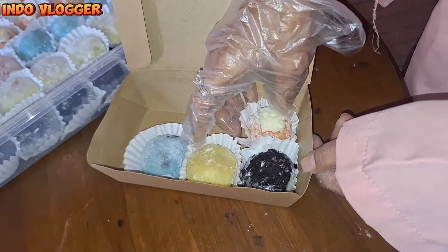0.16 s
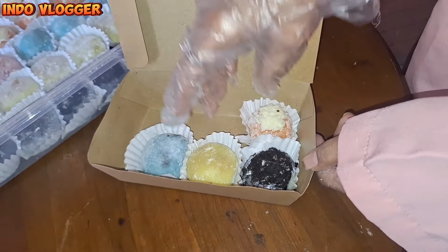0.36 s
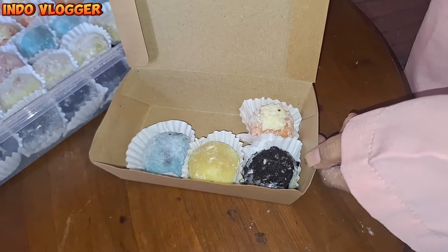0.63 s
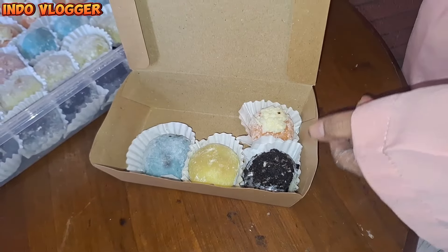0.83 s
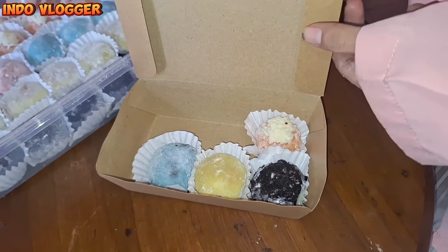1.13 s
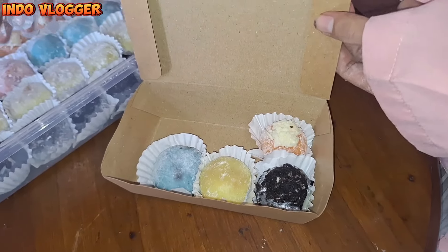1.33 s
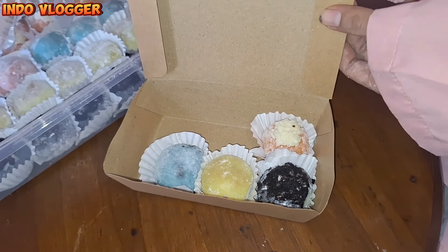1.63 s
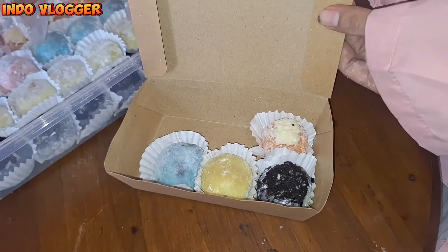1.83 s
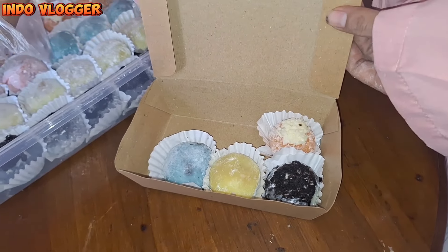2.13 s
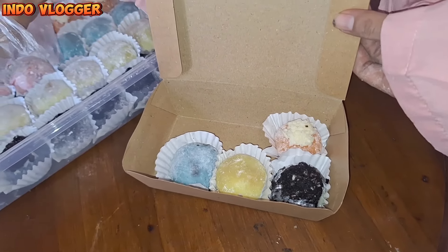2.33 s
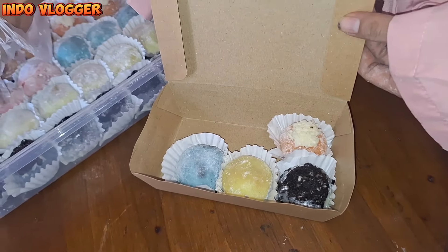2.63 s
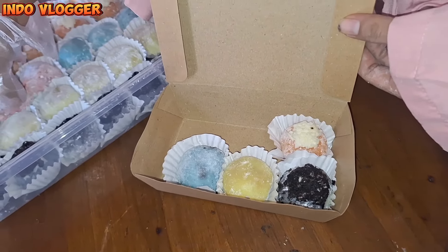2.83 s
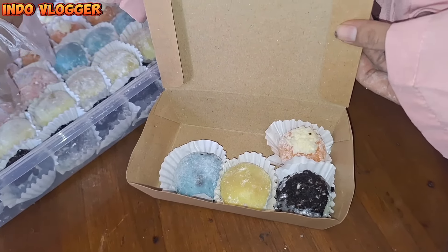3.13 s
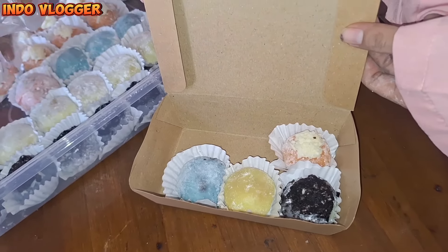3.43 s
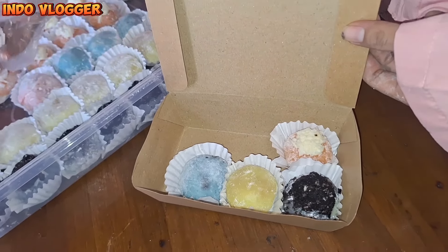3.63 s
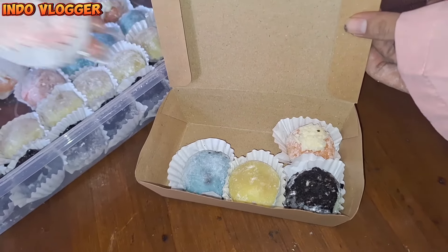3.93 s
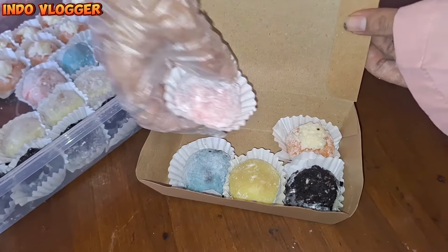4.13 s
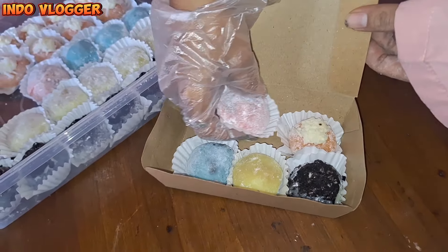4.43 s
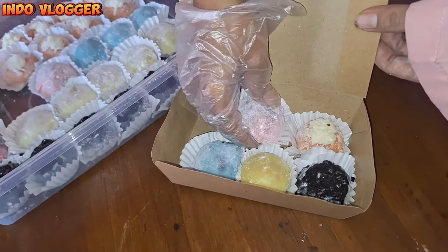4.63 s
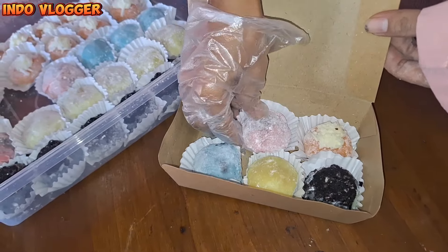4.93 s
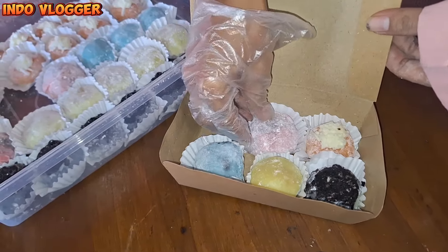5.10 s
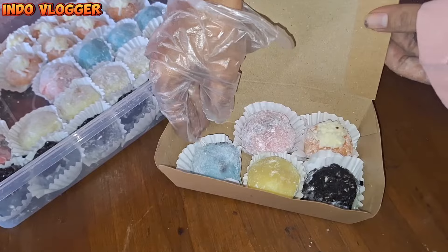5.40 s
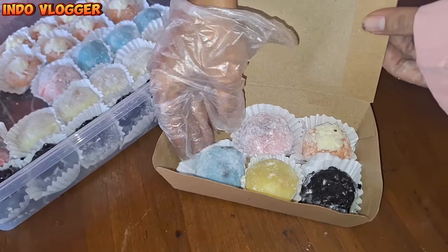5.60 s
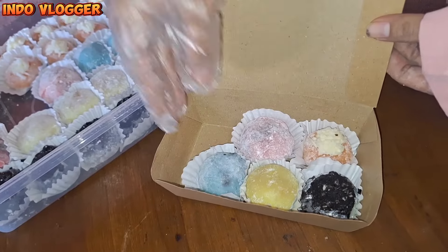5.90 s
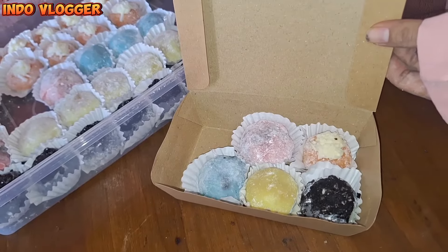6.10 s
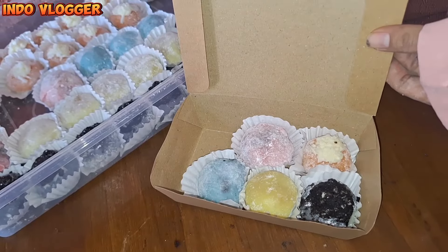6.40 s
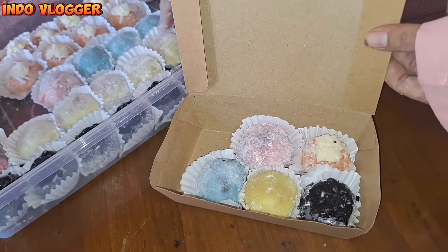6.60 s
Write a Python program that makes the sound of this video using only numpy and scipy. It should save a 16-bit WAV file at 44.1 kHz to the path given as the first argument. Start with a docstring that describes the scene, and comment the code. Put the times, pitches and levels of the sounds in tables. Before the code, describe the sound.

Close stereo pickup at a wooden table: bright, dry film crinkle from a gloved hand, a quick cardboard click, a long stretch of sparse soft rustling, then busy crackling and paper rubbing as a cup is tucked into a card box, ending with small scrapes. Beneath it all, muffled traffic rumble and wavering low motor tones come and go, strongest in the first half.

```python
"""A low engine drone and street rumble come into a small room, while a thin plastic glove starts to crinkle.
A hand fetches a cake in a paper cup and tucks it into a cardboard box on a wooden table.
The box lid snaps once at its fold, something knocks further off, and later cups bump and scrape the box.
Motors are wavering sine tones, the film is clumps of tiny noise bursts, and rumble and air are coloured noise.
Card and wood ring as fading tones set off by clicks; the card is also rubbed by bursts of noise."""
import sys
import numpy as np
from scipy import signal
from scipy.fft import rfft, irfft, next_fast_len
from scipy.io import wavfile

SR = 44100
rng = np.random.default_rng(int(sys.argv[2]) if len(sys.argv) > 2 else 0)


def materialize(psi):
    """Save the field psi as 16-bit PCM at rate SR to the path in sys.argv[1].

    A 1-D psi becomes a single channel; in a 2-D psi each row is a channel.
    """
    bounded = np.clip(np.atleast_2d(psi).T, -1, 1)
    quanta = np.round(bounded * 32767).astype(np.int16)
    wavfile.write(sys.argv[1], SR, quanta)


N = 297675
TIME = np.arange(N) / SR   # seconds
CUTOFF_HZ = 16100   # nothing is wanted above this


def from_db(db):
    """Turn decibels into a gain."""
    return 10 ** (np.asarray(db) / 20)


def rms_one(x):
    """Scale a sound to an average power of 1."""
    return x / np.sqrt(np.mean(x ** 2) + 1e-20)


def in_time(rows):
    """Draw each column of a table as a smooth line over time, sample by sample."""
    times_s, *columns = np.transpose(rows)
    return [np.interp(TIME, times_s, column) for column in columns]


def at_hz(points, hz):
    """Read a table of (pitch, value) between its points, with pitch on a log scale."""
    pitch_hz, value = np.transpose(points)
    return np.interp(np.log(hz + 1e-3), np.log(pitch_hz), value)


def pan(x, left_db):
    """Make the left ear louder than the right by left_db, half of it on each side."""
    return x * from_db(np.array([[.5], [-.5]]) * left_db)


def drift(rate_hz):
    """Wander slowly at random: noise smoothed at a fortieth of the sample rate, with a spread of 1."""
    r = np.exp(-80 * np.pi * rate_hz / SR)
    noise = rng.standard_normal(N // 40 + 2002)
    slow = signal.lfilter([1], [1, -2 * r, r * r], noise)[2000:]   # skip the filter's start
    return np.interp(np.arange(N) / 40, np.arange(len(slow)), rms_one(slow))


def colour(pair, spectrum):
    """Give two unrelated signals a spectrum and the room's left-right likeness, at power 1."""
    # how alike the two ears are: pitch_hz [Hz], likeness [-1 opposite to 1 same]
    ear_likeness = [(100, 0.75), (250, 0.87), (500, 0.45), (1000, -0.14), (2000, 0.067), (4000, -0.11),
                    (14000, -0.04)]
    size = next_fast_len(N)
    hz = np.arange(size // 2 + 1) * SR / size
    a, b = rfft(pair, size) * from_db(at_hz(spectrum, hz)) * (hz < CUTOFF_HZ)
    # mixing the two by this angle makes them as alike as the table says
    turn = np.arcsin(np.clip(at_hz(ear_likeness, hz), -1, 1)) / 2
    left = a * np.cos(turn) + b * np.sin(turn)
    right = b * np.cos(turn) + a * np.sin(turn)
    return rms_one(irfft([left, right], size)[:, :N])


def ring(clicks, modes):
    """Let clicks set off a body's fading tones, each with its own pitch, strength and fade time."""
    out = 0
    for k, (hz, db, t60_s) in enumerate(modes):
        r = from_db(-60 / (t60_s * SR))   # loss per sample
        w = 2 * np.pi * hz / SR
        tone = signal.lfilter([0, np.sin(w)], [1, -2 * r * np.cos(w), r * r], clicks + 1e-18)
        out = out + (-1) ** k * from_db(db) * tone   # every other tone is upside down
    return out


def bursts(rows):
    """Make a loudness curve of sudden starts that die away, from rows of (start_s, level_db, length_s)."""
    out = np.zeros(N)
    for start_s, db, length_s in rows:
        first = int(start_s * SR)
        age = TIME[:min(N - first, SR // 2)]
        out[first:][:len(age)] += from_db(db) * np.exp(-age / length_s)
    return out


def room(x, wet_db):
    """Add the echoes of a small room: a short noise tail, different at each ear and duller than the source."""
    t60_s = .22
    age = TIME[:SR // 2]
    tail = rng.standard_normal((2, len(age))) * from_db(-60 * age / t60_s) * (age > .003)
    tail = signal.sosfilt(signal.butter(1, 5000, fs=SR, output="sos"), tail)
    tail /= np.sqrt(np.sum(tail ** 2) / 2)
    return x + from_db(wet_db) * signal.fftconvolve(x, tail, axes=1)[:, :N]


def background():
    """Street rumble through the walls, a faint hum and the hiss of still air: shaped noise and sine tones."""
    # rumble loudness before a trim: time_s [s], level_db [dB]
    street_level = [(0, -24), (.5, -22.5), (.8, -26.5), (1.2, -24), (1.8, -27.5), (2.05, -29.5), (2.8, -27),
                    (3.5, -32), (4.1, -34), (4.8, -29.5), (5.4, -34.5), (6.2, -35), (6.75, -34.5)]
    # rumble spectrum: pitch_hz [Hz], density_db [dB per Hz, relative]
    rumble_spectrum = [(20, -24), (33, 1), (42, 0), (58, 5.5), (85, -4), (115, 8), (160, -5.5), (230, -17),
                       (300, -14), (400, -17), (520, -20), (800, -23), (1500, -34), (4000, -50.5)]
    # tones humming in the room: pitch_hz [Hz], level_db [dB rms before the changes below]
    hum_tones = [(355.3, -55), (599.8, -61)]
    # slow change of the hum: time_s [s], change_db [dB]
    hum_level = [(0, 3), (1.7, 4), (2.6, -1), (6.75, -1)]
    street_db, = in_time(street_level)
    rumble = from_db(street_db - 3.5) * colour(rng.standard_normal((2, N)), rumble_spectrum)
    change_db, = in_time(hum_level)
    hum = 0
    for hz, db in hum_tones:
        loudness = np.sqrt(2) * from_db(db + change_db + 3 * drift(6))
        hum = hum + loudness * np.sin(2 * np.pi * hz * TIME)
    air_spectrum = [(100, 0), (500, -4), (1200, -12), (3000, -19), (16000, -28)]
    air = from_db(-70) * colour(rng.standard_normal((2, N)), air_spectrum)
    return pan(rumble, left_db=1.5) + hum + air


def engine():
    """Slightly uneven firing makes a base tone; a few overtones follow its pitch and part of its loudness."""
    # engine speed: time_s [s], firing_hz [Hz]
    speed = [(0, 65.5), (.2, 65.6), (.4, 61), (.85, 66), (1.2, 69.8), (1.5, 71.8), (2.05, 72.2),
             (2.4, 70.3), (2.95, 66.2), (3.4, 62), (4.4, 67), (5.3, 68), (5.85, 64.3), (6.2, 66.4),
             (6.75, 65)]
    # loudness of the base tone before a trim and wavering: time_s [s], level_db [dB]
    base_level = [(0, -38.5), (.17, -28), (.29, -43), (.55, -37), (.85, -33.5), (1.2, -18.5), (1.7, -36),
                  (1.98, -35.5), (2.2, -25), (2.4, -28), (2.82, -21), (3.2, -34.5), (4.1, -38),
                  (4.95, -33.5), (5.2, -37), (5.55, -31.5), (6.1, -28.5), (6.5, -38.5)]
    # overtones: order [multiple of the firing rate], level_db [dB, relative, before a trim]
    overtones = [(2, 0.5), (3, -36), (4, -20.5), (5, -27.5), (6, -23.5), (8, -30.5)]
    hz, = in_time(speed)
    base_db, = in_time(base_level)
    # shared overtone level: -35 dB when the base is at -28 dB, with 0.82 of the base's swing
    overtone_db = -35 + 0.82 * (base_db + 28)
    overtone_db -= 2 * (TIME - TIME.mean())   # 2 dB per second: the engine grows duller
    phase = 2 * np.pi * np.cumsum(hz * (1 + 0.0075 * drift(9.8))) / SR
    drone = from_db(base_db - 0.7 + 2.4 * drift(13)) * np.sin(phase)
    for order, db in overtones:
        loudness = from_db(overtone_db + db - 1.5 + 2.5 * drift(6.8))
        drone += loudness * np.sin(order * phase + rng.uniform(0, 2 * np.pi))
    return pan(np.sqrt(2) * drone, left_db=4.0)


def glove():
    """The film crinkles brightly, rubs on itself and presses pleated paper; now and then one crease pops."""
    # where the hand is: time_s [s], left_db [dB, how much louder on the left]
    hand_place = [(0, 0.2), (.6, 1), (1.1, 2), (1.7, 1.5), (2.2, 3), (3.7, 2), (4.1, 1.5), (4.3, -1),
                  (6, -0.5), (6.3, 1.8), (6.75, 0.5)]
    # spectra of the three film sounds: pitch_hz [Hz], density_db [dB per Hz, relative]
    crinkle_spectrum = [(1500, -28), (3000, -8.5), (5000, -1.5), (7800, 1), (9500, -2.5), (13000, 0.5),
                        (16000, -4)]
    rub_spectrum = [(900, -16.5), (1600, -4), (2200, -4.5), (2900, -1), (3700, -0.5), (5000, -3),
                    (9000, -6.5)]
    press_spectrum = [(120, -60), (220, -1.5), (330, -4.5), (500, -2.5), (750, 0.5), (1200, -0.5),
                      (1700, 1.5), (2400, 0.5), (4000, -24)]
    # the loudest creases popping: start_s [s], strength_db [dB before a trim]
    loud_creases = [(.576, -26), (.788, -24.5), (1.16, -29), (2.825, -25), (4.053, -21), (4.167, -23),
                    (4.305, -19), (4.626, -14), (4.753, -13), (5.018, -16), (5.357, -15), (5.3785, -11)]
    crinkle_db, rub_db, press_db = rustle_levels()
    left_db, = in_time(hand_place)
    crinkle = crackle(per_s=4000, spread_db=-0.5, clump_db=2.3, grain_s=0.0006)
    crinkle = from_db(crinkle_db - 0.7) * colour(crinkle, crinkle_spectrum)
    rub = colour(crackle(per_s=2700, spread_db=1.5, clump_db=1.0, grain_s=0.0035), rub_spectrum)
    rub = from_db(rub_db + 2.5) * narrow(rub, width=0.96)
    press = colour(crackle(per_s=1200, spread_db=0.5, clump_db=2.0, grain_s=0.005), press_spectrum)
    press = from_db(press_db + 2.5) * narrow(press, width=0.46)   # the cups sit straight ahead
    pop_rows = [(start_s, db - 4.5, .0012) for start_s, db in loud_creases + small_pops(crinkle_db)]
    pop_spectrum = [(400, -32), (2000, -1.0), (7000, 8), (16000, 9.0)]
    pops = bursts(pop_rows) * colour(rng.standard_normal((2, N)), pop_spectrum)
    film = lid_echo(folds(crinkle + rub + press, shift_db=2.0, treble_right_db=3.0))
    return room(pan(film + pops, left_db), wet_db=-14.0)


def rustle_levels():
    """Each move swells, holds and fades; stronger moves rub more. Gives the dB of crinkle, rub and press."""
    # Finger moves: let go of a cake, steady the lid, reach over the tray, pick the next cake,
    # lift it out, set it down, tuck it in, pull away, reach for another.
    # start_s [s], length_s [s], crinkle_db [dB], fade_s [s], extra_rub_db [dB],
    # pressure_db [dB relative to the crinkle, on the paper cups]; levels before the glove's trims
    moves = [(-.045, .09, -32, 0.071, 2, -17), (0.036, 0.033, -35, 0.022, 12, -10),
             (0.094, .42, -35.5, 0.066, -1, -12.5), (0.423, 0.045, -29.5, 0.017, -15, -15),
             (1.08, 0.23, -43, 0.11, -1, -13.5), (1.947, 0.046, -41, .04, 3, -14),
             (2.068, 0.33, -43.5, 0.021, 3.5, -18), (2.444, 0.09, -37.5, 0.26, 6, -22),
             (2.655, 0.34, -41.5, 0.14, 8.5, -15), (2.772, 0.18, -38.5, 0.033, 4, -22),
             (3.1, 0.14, -45.5, .04, 8, -35), (3.421, 0.2, -40, .05, 3, -30),
             (3.508, 0.11, -36, .03, 1, -14.5), (3.674, 0.13, -39.5, 0.02, -1, -21),
             (3.946, 0.13, -49.5, 0.017, -6, -18), (4.195, 0.077, -35.5, 0.072, -1, -3.5),
             (4.262, 0.33, -36, 0.07, 3, -7.5), (4.408, 0.35, -35, 0.078, 3, -7),
             (4.59, 0.15, -28, 0.21, -2.5, -10.5), (4.839, .22, -29, 0.11, -1, -11),
             (5.184, 0.19, -29.5, 0.042, -3, -11), (5.323, 0.056, -28.5, 0.011, -1.5, -7.5),
             (5.403, 0.16, -31, 0.082, -0.5, -9), (5.617, 0.055, -35.5, 0.017, 9.5, -13),
             (5.742, 0.17, -36, 0.036, 3, -10.5), (5.876, 0.12, -30.5, 0.0066, -4, -12),
             (6.217, .14, -42.5, 0.064, -15, -22), (6.416, 0.33, -35, 0.043, -5, -12)]
    # the film keeps stirring faintly between moves: time_s [s], crinkle_db [dB before a trim]
    stirring = [(0, -50), (.8, -45.5), (1.0, -48), (1.38, -47), (1.58, -61.5), (1.7, -54.5), (1.8, -49),
                (2.4, -41.5), (3.3, -45.5), (4.1, -45.5), (6.1, -48.5), (6.75, -39.5)]
    attack_s = 0.035
    stir_db, = in_time(stirring)
    power = from_db([stir_db, stir_db - 11.5, stir_db - 18]) ** 2   # crinkle, rub, press
    for start_s, length_s, db, fade_s, extra_rub_db, pressure_db in moves:
        age = TIME - start_s
        move = np.clip(age / attack_s, 0, 1) * np.exp(-np.maximum(age - length_s, 0) / fade_s)
        # a crinkle of -36 dB rubs at -43 dB plus the extra; the rub grows faster than the crinkle
        rub_db = -43 + 1.26 * (db + 36) + extra_rub_db
        power += np.outer(from_db([db, rub_db, db + pressure_db]), move) ** 2
    return 10 * np.log10(power)


def crackle(per_s, spread_db, clump_db, grain_s):
    """Tiny buckles of film come in clumps; each is a brief noise burst, different at the two ears."""
    born = rng.random(N) < per_s * from_db(clump_db * drift(25)) / SR
    energy = born * from_db(spread_db * np.minimum(rng.exponential(1, N), 4)) ** 2
    energy = signal.lfilter([1], [1, -np.exp(-2 / (grain_s * SR))], energy + 1e-18)
    return rms_one(np.sqrt(energy) * rng.standard_normal((2, N)))


def small_pops(crinkle_db):
    """Lesser creases pop at random, stronger when the film is busy; gives (start_s, strength_db) rows."""
    draws = rng.random((100, 2))
    times = np.cumsum(-np.log(1 - draws[:, 0])) / 5.5   # on average 5.5 pops per second
    pops = []
    for start_s, size in zip(times, draws[:, 1]):
        if start_s < TIME[-1]:
            # 10 dB above the crinkle, give or take 3 dB, before the trims in the glove
            pops.append((start_s, crinkle_db[int(start_s * SR)] + 10 + 6 * (size - .5)))
    return pops


def folds(x, shift_db, treble_right_db):
    """As the film changes shape, narrow bands of pitch swell and fade on their own; the top leans right."""
    size = next_fast_len(N)
    hz = np.arange(size // 2 + 1) * SR / size
    step = 6 * np.log2(np.clip(hz, 1000, 16000) / 1000)   # six bands to the octave
    whole, out = rfft(x, size), 0
    for k in range(25):
        band = irfft(whole * np.maximum(1 - abs(step - k), 0), size)[:, :N]
        swell = rms_one(from_db(shift_db * drift(18)))
        out = out + pan(band, -treble_right_db * (k / 24) ** 4) * swell
    return out


def lid_echo(x):
    """The upright lid reflects the hand's sound; a slowly wandering delay stands for the moving hand."""
    late = TIME - .0011 * (1 + .2 * drift(2))
    nearest = np.clip(np.round(late * SR).astype(int), 0, N - 1)
    return x + from_db(-15) * x[:, nearest]


def narrow(x, width):
    """Draw a sound towards the middle, keeping this share of its left-right difference."""
    mid = x.mean(axis=0)
    return rms_one(mid + np.clip(width, 0, 1) * (x - mid))


def low_noise():
    """Low noise, mostly 150-250 Hz, that comes and goes."""
    # loudness: time_s [s], level_db [dB]
    low_noise_level = [(0, -40.5), (.45, -41.5), (.8, -55), (2.6, -60), (3.5, -45), (4.1, -47), (5, -46.5),
                       (5.6, -41), (6.75, -50.5)]
    # spectrum: pitch_hz [Hz], density_db [dB per Hz, relative]
    low_noise_spectrum = [(110, -14), (165, -4), (230, -3), (330, -16), (450, -19.5), (900, -52)]
    db, = in_time(low_noise_level)
    return from_db(db) * colour(rng.standard_normal((2, N)), low_noise_spectrum)


def second_motor():
    """A motor further down the street drones in and out: one tone, wavering in pitch and loudness."""
    # drone: time_s [s], pitch_hz [Hz before wavering], level_db [dB rms before wavering and panning]
    motor_curve = [(0, 112, -63), (.42, 117, -25), (.7, 116, -53), (1.7, 109, -39), (2.3, 110, -43),
                   (3.45, 117, -35.5), (3.9, 114, -45.5), (4.8, 113, -42.5), (6.75, 113, -42)]
    hz, db = in_time(motor_curve)
    phase = 2 * np.pi * np.cumsum(hz * (1 + 0.01003 * drift(7.83))) / SR
    return pan(np.sqrt(2) * from_db(db + 2.2 * drift(7)) * np.sin(phase), left_db=6.5)


def lid():
    """The fold gives way in a few quick slips; each is a click that rings the stiff card."""
    # slips of the fold: start_s [s], strength_db [dB, relative]
    slip_times = [(0.7159, 0), (0.7176, -5), (0.7182, -23), (0.718, -24), (0.7202, -17)]
    # tones of the lid: pitch_hz [Hz], level_db [dB], t60_s [s to fade by 60 dB]
    lid_modes = [(270, -20.5, 0.059), (398, -19, 0.033), (710, -15.5, 0.013), (946, -13, 0.017),
                 (2070, -7.5, 0.015), (3920, -9.5, 0.01), (5080, -5.5, 0.012), (6160, -1.5, 0.0028),
                 (8900, -10.5, 0.0023), (11400, -6.5, 0.0018), (14500, -9, 0.0018)]
    clicks = np.zeros(N)
    for start_s, db in slip_times:
        clicks[int(start_s * SR)] += from_db(db)
    snap = ring(clicks, lid_modes)
    far_ear = np.interp(TIME - .0001, TIME, snap)   # the left ear hears it a little later
    return room(pan(np.array([far_ear, snap]), left_db=-3.0), wet_db=-21)


def knocks():
    """Dull distant knocks ring the wood, with a tail of noise whose lows and very top last longest."""
    # knocks: start_s [s], strength_db [dB]
    knock_times = [(1.729, -18.5), (2.87, -28.5), (6.5, -34.5), (6.669, -33.5)]
    # spectrum of the noise: pitch_hz [Hz], density_db [dB per Hz, relative]
    knock_spectrum = [(100, -24), (220, 0.5), (340, -2), (520, 7.5), (680, -3.5), (870, -4.5), (1200, -1.5),
                      (1900, -12.5), (3200, -17.5), (6000, -25.5), (14000, -42)]
    # fading of the noise: pitch_hz [Hz], t60_s [s to fade by 60 dB]
    knock_fade = [(150, 0.43), (900, 0.39), (3000, 0.36), (10000, 0.43)]
    # tones of the knocked wood: pitch_hz [Hz], level_db [dB], t60_s [s to fade by 60 dB]
    wood_modes = [(212, -7, 0.38), (261, -21, .25), (351, -4, 0.073), (522, -14, 0.12), (824, -9.5, 0.14),
                  (890, -43, 0.13)]
    noise = colour(rng.standard_normal((2, N)), knock_spectrum)
    clicks = np.zeros(N)
    for start_s, db in knock_times:
        clicks[int(start_s * SR)] += from_db(db)
    out = room(ring(clicks, wood_modes) * np.ones((2, 1)), wet_db=-15)
    edges = np.geomspace(90, 15000, 7)   # six bands, each with its own fade
    for low, high in zip(edges, edges[1:]):
        length_s = at_hz(knock_fade, np.sqrt(low * high)) / np.log(1000)
        band = signal.butter(2, [low, high], "band", fs=SR, output="sos")
        tail = noise * bursts([(start_s, db, length_s) for start_s, db in knock_times])
        out = out + signal.sosfilt(band, tail)
    return out


def box():
    """Cups tap the box, then their paper pleats catch and slip on the card; both set its walls ringing."""
    # bumps and scrapes: start_s [s], strength_db [dB before a trim], length_s [s to fade to a third or so]
    cup_bumps = [(4.227, -36, .01), (4.354, -44, .015), (4.605, -41, .01), (4.867, -41, .015),
                 (5.378, -15.5, .0015), (5.886, -33, .008), (5.899, -26, .008), (5.913, -25, .008),
                 (5.922, -28, .012), (6.4998, -35, .006), (6.6694, -43, .005)]
    # tones of the box walls: pitch_hz [Hz], level_db [dB, relative], t60_s [s to fade by 60 dB]
    box_modes = [(195, -14, .15), (232, -15, .12), (610, -9, .04), (672, -5, .04), (727, -7, .04),
                 (795, -9, .16), (963, -7, .04), (1060, -7, .04), (1261, -7, .05), (1360, -10, .04),
                 (1750, -3, .015), (2100, -5, .015), (2560, -5, .02)]
    taps = np.zeros(N)
    for start_s, db, length_s in cup_bumps:
        # about as much energy as the slips that follow
        taps[int(start_s * SR)] = from_db(db) * np.sqrt(length_s * SR / 2)
    slips = bursts(cup_bumps) * crackle(per_s=4000, spread_db=1.8, clump_db=.4, grain_s=.0004)
    return room(from_db(-22.5) * ring(taps + slips, box_modes), wet_db=-12)


def scene():
    """Add up the table, the low noise and hum of the room, and the sound from outside."""
    surroundings = background() + engine() + low_noise() + second_motor()
    return surroundings + glove() + lid() + knocks() + box()


def record(dry):
    """Peaks stop at full scale, then the top of the treble is cut off."""
    low_pass = signal.ellip(12, .1, 80, CUTOFF_HZ, fs=SR, output="sos")
    return signal.sosfilt(low_pass, np.clip(dry, -1, 1))


dry = scene()
out = record(dry)
materialize(out)
```